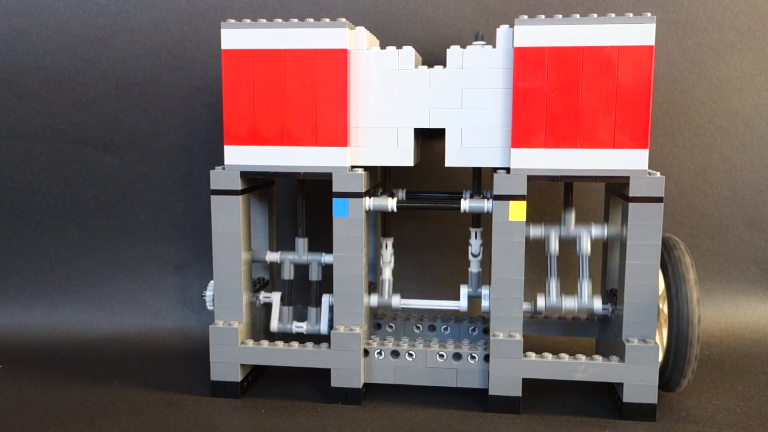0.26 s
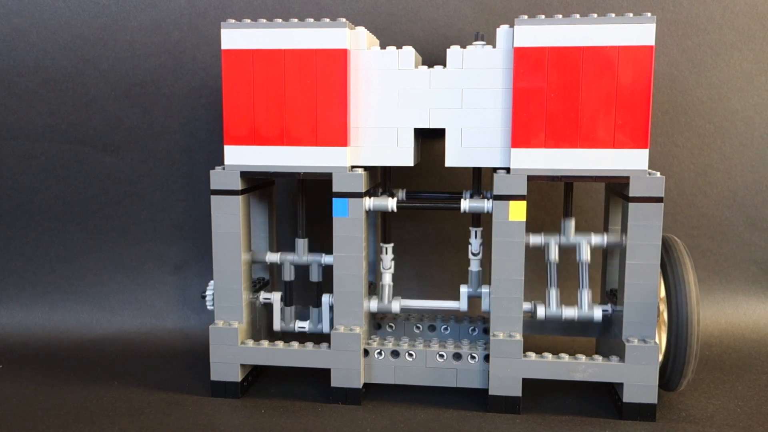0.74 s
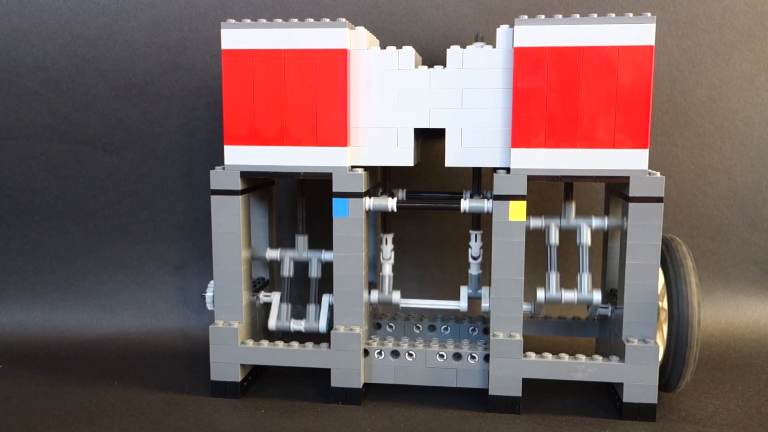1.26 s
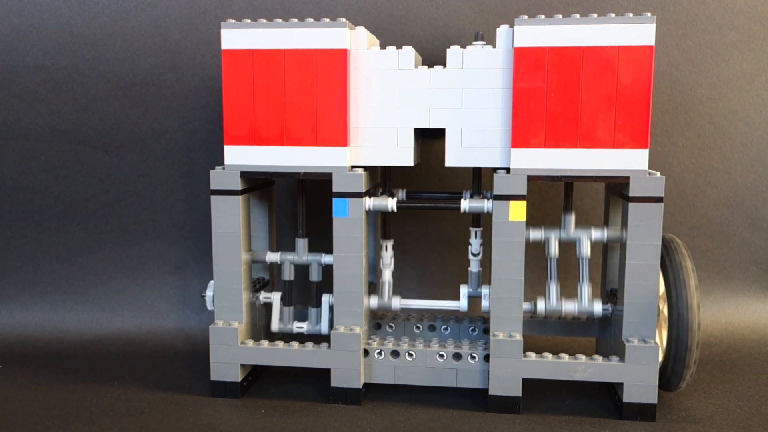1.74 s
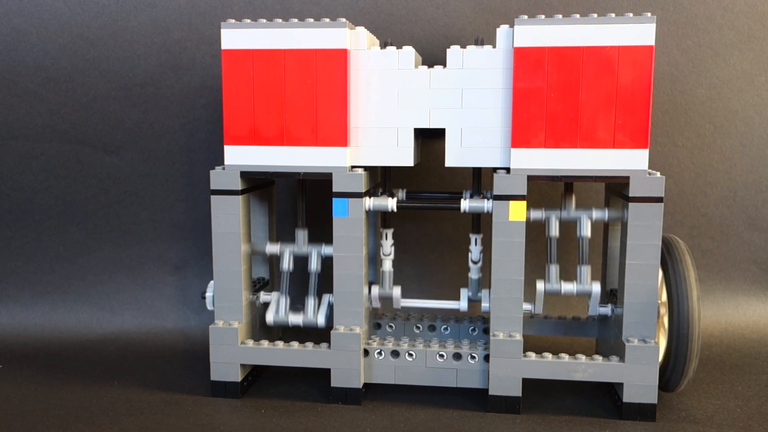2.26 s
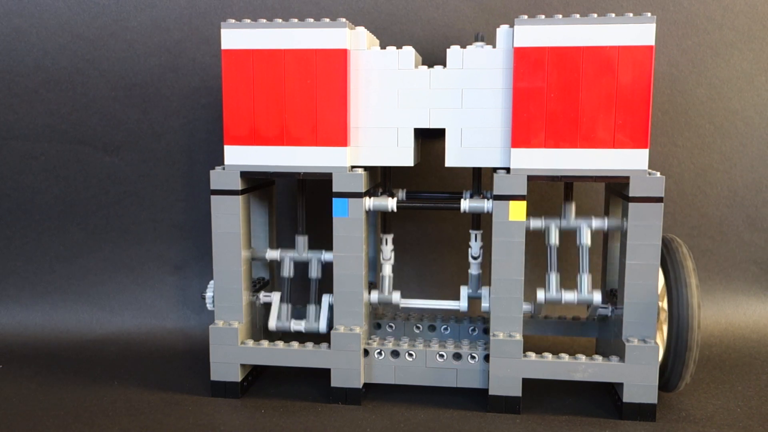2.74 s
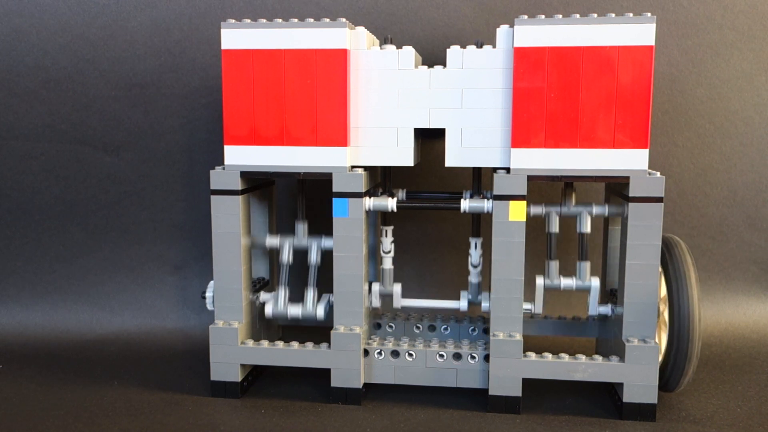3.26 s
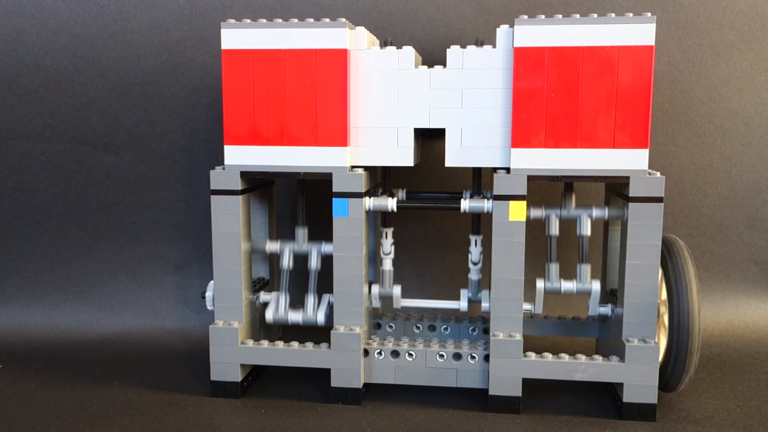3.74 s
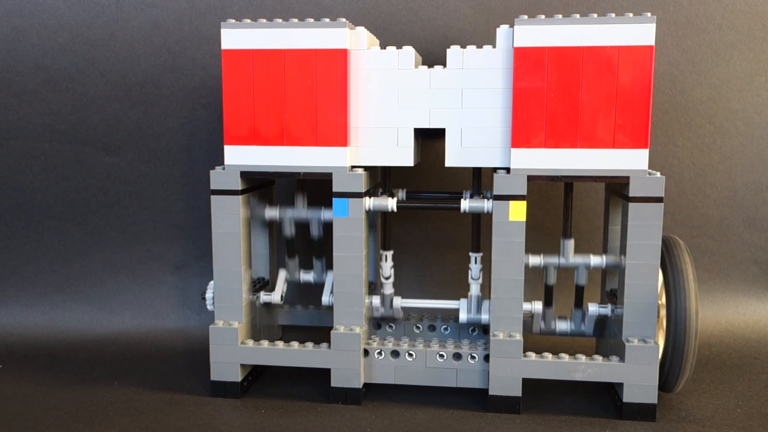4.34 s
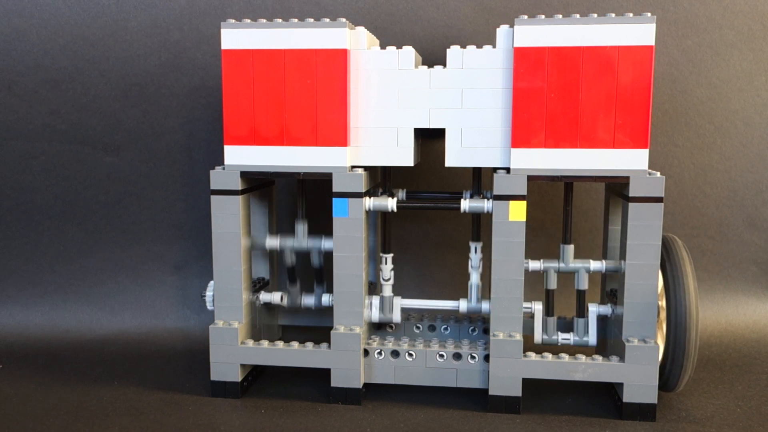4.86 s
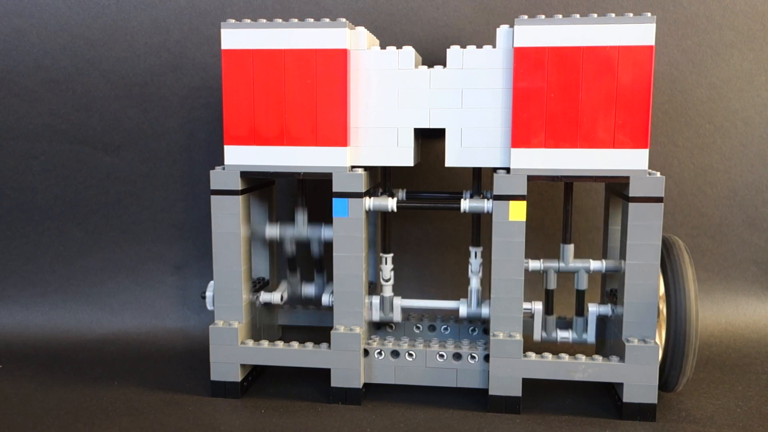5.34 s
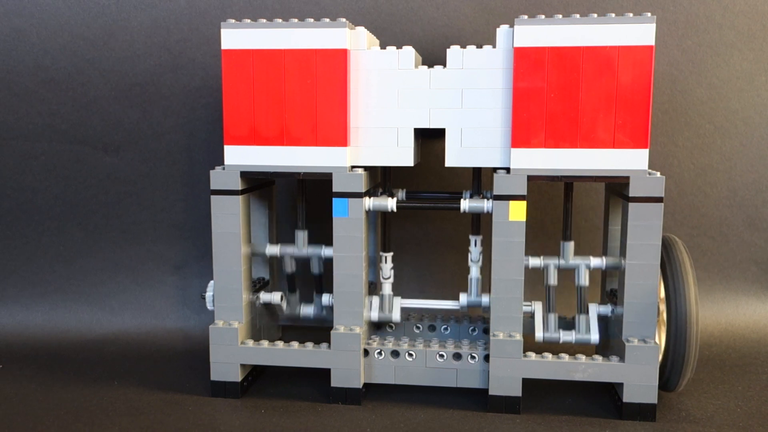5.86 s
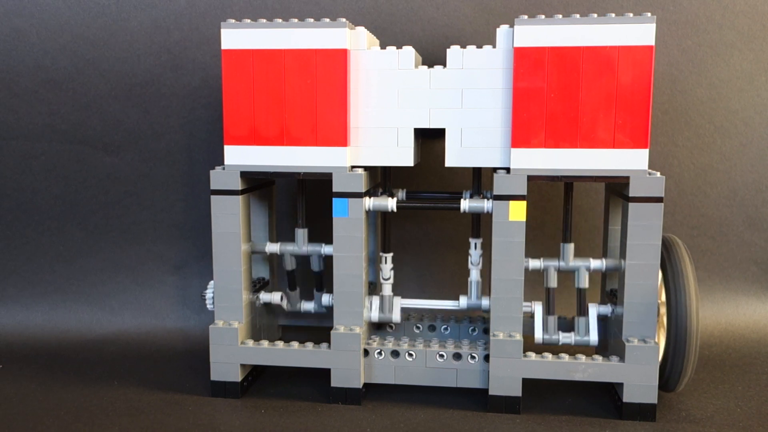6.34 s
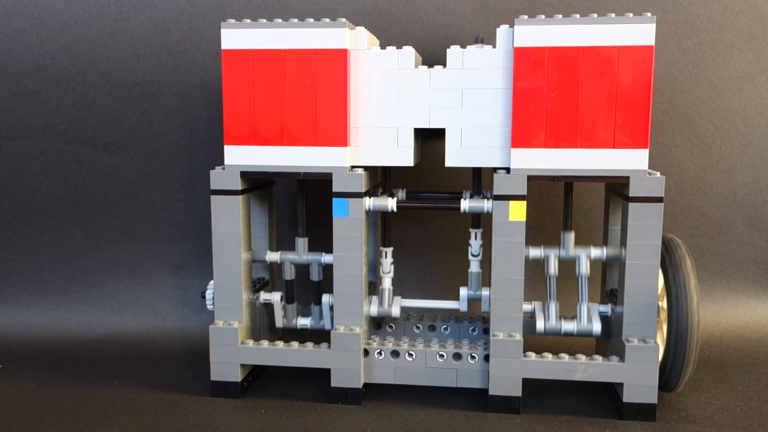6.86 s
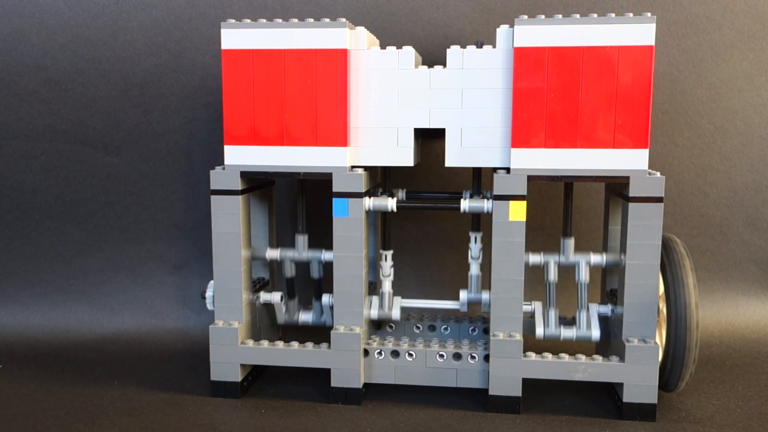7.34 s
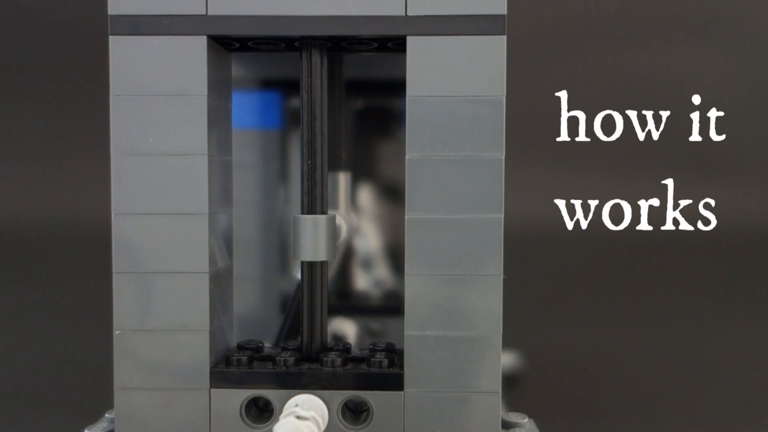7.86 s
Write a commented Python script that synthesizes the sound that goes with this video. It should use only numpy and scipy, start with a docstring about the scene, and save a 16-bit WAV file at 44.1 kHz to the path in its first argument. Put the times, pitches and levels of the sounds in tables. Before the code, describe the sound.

Steady rushing hiss pulses with quick plastic clicks and a tiny squeak each turn, fades to near-silence, then small linkage parts rattle softly.

```python
"""Suction-driven toy engine

A two-cylinder toy engine of plastic bricks turns about four times a second on suction. Turbulent air rushes
steadily into the hose and swells through the ports; small cavities whistle as filtered noise. Valves and rods
knock as decaying sines at set crank angles, and a rod squeaks as a gliding tone. Body and room colour it all.
The engine fades out; after a short near-silence of faint hiss, the linkage rattles as struck modes."""
import sys
import numpy as np
from scipy import signal
from scipy.fft import rfft, irfft, next_fast_len
from scipy.io import wavfile

SR = 44100
rng = np.random.default_rng(int(sys.argv[2]) if len(sys.argv) > 2 else 0)


def inscribe(sig):
    """Save sig as 16-bit PCM at rate SR to the path in sys.argv[1].

    A 1-D sig is mono; a 2-D sig holds one channel per row.
    Samples are clipped to [-1, 1] before scaling.
    """
    pcm = np.round(np.clip(np.atleast_2d(sig).T, -1, 1) * 32767)
    wavfile.write(sys.argv[1], SR, pcm.astype(np.int16))


N = 357077   # length [samples]
PAD = next_fast_len(N)
HZ = np.maximum(np.arange(PAD // 2 + 1) * SR / PAD, 1)   # frequency grid [Hz]


def from_db(db):
    """Level to amplitude: 20 dB is a factor of ten."""
    return 10 ** (np.asarray(db) / 20)


def rms_one(x):
    """Power normalisation: scale to unit rms."""
    return x / np.sqrt(np.mean(x ** 2) + 1e-20)


def over_hz(points):
    """Logarithmic frequency scale: interpolate a table's second column over log frequency."""
    hz, value = np.transpose(points)
    return np.interp(np.log(HZ), np.log(hz), value)


def drift(rate_hz):
    """Random fluctuation: white noise through a two-pole low-pass, scaled to unit rms."""
    step = 40   # samples between computed values
    pole = np.exp(-2 * np.pi * rate_hz * step / SR)
    noise = rng.standard_normal(N // step + 2002)
    slow = signal.lfilter([1], [1, -2 * pole, pole ** 2], noise)[2000:]   # drop the filter's start
    return np.interp(np.arange(N) / step, np.arange(len(slow)), rms_one(slow))


def air(gain, alike):
    """Partial coherence: mid and side noise mixed to a set left-right correlation, shaped by gain; unit rms."""
    mid, side = rfft(rng.standard_normal((2, PAD))) * gain
    alike = np.clip(alike, 0, 1)
    common = np.sqrt(1 + alike) * mid
    opposed = np.sqrt(1 - alike) * side * [[1], [-1]]
    return rms_one(irfft(common + opposed, PAD)[:, :N])


def resonance(hz, width_hz):
    """Simple resonance: gain 1 at the centre, falling by 3 dB at half the width to either side."""
    return 1 / np.sqrt(1 + (2 * (HZ - hz) / width_hz) ** 2)


def ring(clicks, hz, t60_s):
    """Damped oscillation: a unit click excites a sine of height 1 that falls 60 dB in t60."""
    radius, angle = from_db(-60 / (t60_s * SR)), 2 * np.pi * hz / SR
    return signal.lfilter([0, np.sin(angle)], [1, -2 * radius * np.cos(angle), radius ** 2], clicks + 1e-18)


def without_bass(x):
    """Inefficient radiation at long wavelengths: small parts radiate little bass."""
    return signal.sosfilt(signal.butter(2, 500, "high", fs=SR, output="sos"), x)


def from_angle(turns, centre):
    """Cyclic phase: signed distance in turns from the nearest passage of a crank angle."""
    return (turns - centre + .5) % 1 - .5


def bell(turns, centre, length):
    """Periodic modulation: a Gaussian swell once a turn, 1 on top."""
    return np.exp(-.5 * (from_angle(turns, centre) / length) ** 2)


FIRST_TURN_S, TURNS_PER_S, SPEED_UP_PER_S = -.006, 4.047, .0064   # [s], [turns/s], [turns/s per s]


def crank():
    """Uniform angular acceleration: turns made at each sample, gaining speed slowly."""
    s = np.arange(N) / SR - FIRST_TURN_S
    return s * (TURNS_PER_S + SPEED_UP_PER_S * s / 2)


# Spectrum of the steady suction: (frequency [Hz], relative density [dB])
RUSH_SPECTRUM = [(18, -60.5), (30, -36), (60, -37), (129, -26), (306, -12.5), (540, -14.5), (626, -13.5),
                 (1220, -9.5), (1770, -11), (2830, -5), (3280, -7.5), (4630, -4.5), (5110, 1),
                 (6080, -14.5), (9030, -15), (11000, -10), (14300, -48), (22000, -120)]
RUSH_DB = -22


def rush(alike):
    """Turbulent flow noise: broadband noise with a slight wavering of level."""
    level = from_db(RUSH_DB + 0.33 * drift(26))
    return level * air(from_db(over_hz(RUSH_SPECTRUM)), alike)


# Spectrum of air through the ports: (frequency [Hz], relative density [dB])
PORT_SPECTRUM = [(88, -50.5), (150, -23.5), (325, -9.5), (362, -15.5), (1790, -8), (2810, -2), (3240, -5.5),
                 (5080, -6.5), (6080, -12), (9030, -15), (11000, -15.5), (14300, -40), (22000, -120)]
# Three swells of air a turn: (centre [turns], length [turns], opening level [dB])
PORT_SWELLS = [(.3, 0.057, -4.5), (0.719, 0.072, -2.5), (.98, 0.11, 0.5)]
PORT_DB, LEAK_DB = -23.5, -16   # noise level; share that passes when the ports are shut


def ports(turns, alike):
    """Amplitude modulation of flow noise: hiss swells as the ports open, with turbulent flicker."""
    opening = from_db(LEAK_DB)
    for centre, length, db in PORT_SWELLS:
        opening = opening + from_db(db) * bell(turns, centre, length)
    level = from_db(PORT_DB + 1.5 * drift(40))
    return level * opening * air(from_db(over_hz(PORT_SPECTRUM)), alike)


# Cavities blown for part of each turn:
# (centre [turns], length [turns], frequency [Hz], width of one resonance [Hz], mean level at the puff's top [dB])
CAVITIES = [(0.447, .04, 2490, 70, -31), (.74, 0.05, 2860, 240, -29), (.35, .3, 5200, 200, -27),
            (.82, 0.1, 3580, 320, -29.5), (.84, .08, 7800, 600, -33), (.85, 0.091, 9400, 150, -41),
            (.38, 0.06, 5230, 200, -27), (.58, 0.066, 5260, 250, -25), (.88, .09, 5050, 260, -26.5),
            (.05, 0.07, 5200, 280, -28.5), (.8, 0.18, 7400, 2000, -37.5), (.3, 0.048, 560, 150, -39),
            (.8, 0.087, 4320, 390, -31.5), (.78, .12, 2050, 300, -34), (.68, .06, 10000, 300, -40),
            (.52, .1, 5650, 400, -34)]


def whistles(turns, alike):
    """Cavity resonance: noise passes each resonance twice, blown in a puff whose strength wavers."""
    out = 0
    for centre, length, hz, width_hz, db in CAVITIES:
        strength = from_db(db + .8 * drift(7) + .8 * drift(60))
        puff = strength * bell(turns, centre, length)
        out = out + puff * air(resonance(hz, width_hz) ** 2, alike)
    return out


# Contacts of valves and rods: (crank angle [turns], frequency [Hz], t60 [s], mean first-click level [dB])
CONTACTS = [(.285, 2180, 0.031, -20.5), (.32, 6120, .01, -35.5), (.435, 2518, 0.033, -16.5),
            (.435, 3160, 0.022, -25), (.755, 2868, 0.041, -20), (.98, 2326, 0.028, -18.5),
            (.99, 1676, 0.016, -24.5), (.99, 910, 0.022, -39)]
KNOCK_SPREAD_DB, KNOCK_JITTER_S = 2, .002
BOUNCE_S, BOUNCE_DB = 0.0054, -7.5   # median gap; mean level change per bounce


def knocks(turns):
    """Impact excitation: once a turn, early or late, harder or softer, with two bounces in a loose joint."""
    out, whole = np.zeros((2, N)), np.arange(int(turns[-1]))
    for angle, hz, t60_s, db in CONTACTS:
        chance = rng.standard_normal((len(whole), 9))
        at = np.searchsorted(turns, whole + angle) + KNOCK_JITTER_S * SR * chance[:, 0]
        pan_db = chance[:, 1] * [[1], [-1]]
        clicks = np.zeros((2, N))
        for k in range(3):
            level_db = db + k * BOUNCE_DB + KNOCK_SPREAD_DB * chance[:, 2 + k]
            clicks[:, np.clip(at.astype(int), 0, N - 1)] = from_db(level_db + pan_db)
            at = at + BOUNCE_S * SR * np.exp(.4 * chance[:, 5 + k])
        out += ring(clicks, hz, t60_s)
    return without_bass(out)


# Rod squeak, once a turn: (centre [turns], length [turns], frequency [Hz], rise [Hz per turn],
# starting level [dB], octave level [dB])
ROD_SQUEAK = (0.36, 0.042, 1235, 800, -29, -29)
SQUEAK_GROWS_DB_PER_TURN = .1   # fundamental only


def squeak(turns):
    """Frequency modulation: an unsteady rising tone with its octave, harder on some turns than on others."""
    centre, length, hz, rise_hz, db, octave_db = ROD_SQUEAK
    pitch_hz = hz * (1 + .012 * drift(80)) + rise_hz * from_angle(turns, centre)
    phase = 2 * np.pi * np.cumsum(pitch_hz) / SR
    fundamental = from_db(db + SQUEAK_GROWS_DB_PER_TURN * turns + 2 * drift(50)) * np.sin(phase)
    octave = from_db(octave_db + 2.5 * drift(50)) * np.sin(2 * phase)
    return (fundamental + octave) * bell(turns, centre, length) * from_db(1.2 * drift(3))


# Peaks and dips of hose, frame and room: (frequency [Hz], width [Hz], gain [dB])
BODY_RESONANCES = [(101, 13, 5), (118, 8.9, -1.5), (212, 30, 7), (333, 16, 4), (357, 18, -5),
                   (443.5, 27, 6.5), (525, 84, 4.5), (793, 87, 5), (1022, 27, 0.5), (1160, 22, 5),
                   (1478, 27, 5.5), (1640, 21, 0.5), (1942, 25, 2), (2840, 150, 3.5), (3236, 120, -7.5),
                   (4120, 160, -1.5), (4330, 200, 4), (5152, 22, 3.5), (8380, 100, 4.5), (9220, 440, -3),
                   (9730, 220, 1), (10840, 220, 5)]
# Left channel over right: (frequency [Hz], level difference [dB])
LEFT_OVER_RIGHT = [(60, 0.0), (140, -0.5), (350, -0.5), (840, -1.5), (2020, -2.5), (4870, -2.0),
                   (11700, 0.5)]
# Phase of left ahead of right, negative where it lags: (frequency [Hz], phase [rad])
LEFT_PHASE_LEAD = [(0, 0), (5080, -0.0), (5510, 0.23), (6460, -0.16), (8180, -0.2), (8610, -0.73),
                   (10200, 0.17), (10500, -0.088), (11900, -0.1)]
ROOM_T60_S, ROOM_DB = .12, -12   # reflections: decay time; level against the direct sound


def surroundings():
    """Linear transfer function: body peaks and dips, left-right differences, a short dense tail of reflections."""
    body_db = sum(db * resonance(hz, width_hz) ** 2 for hz, width_hz, db in BODY_RESONANCES)
    decay = from_db(-60 * np.arange(SR // 4) / SR / ROOM_T60_S)
    tail = rng.standard_normal(SR // 4) * decay
    room = 1 + from_db(ROOM_DB) * rfft(tail / np.sqrt(np.sum(tail ** 2)), PAD)
    # left leads or lags right in parts of the treble
    lead = np.exp(.5j * over_hz(LEFT_PHASE_LEAD) * [[1], [-1]])
    lean_db = over_hz(LEFT_OVER_RIGHT) / 2 * [[1], [-1]]
    return room * lead * from_db(body_db + lean_db)


# Spectrum of the faint steady hiss: (frequency [Hz], relative density [dB])
QUIET_SPECTRUM = [(35, -52), (60, -14), (182, -18.5), (259, 4), (367, -6), (1110, -12), (11000, -17.5),
                  (14300, -50.5), (22000, -120)]
QUIET_DB = -78.5


def quiet_hiss():
    """Stationary noise: a constant faint hiss, nearly independent on the two sides."""
    return from_db(QUIET_DB) * air(from_db(over_hz(QUIET_SPECTRUM)), .2)


# Louder ticks: (time [s], nominal level [dB], pitch near which the modes ring most [Hz])
LOUD_TICKS = [(7.896, -55, 2260), (7.907, -49, 3300), (7.922, -44, 7300), (7.932, -44, 5520),
              (7.935, -47, 2260), (7.961, -51, 3300), (7.976, -53, 2260), (7.987, -54, 7300),
              (8.008, -45, 2600), (8.025, -59, 2600), (8.039, -49, 1800), (8.047, -54, 1230),
              (8.058, -51, 3300), (8.080, -52, 1230), (8.091, -50, 7300)]
# Modes of the linkage: (frequency [Hz], relative level [dB], t60 [s])
LINKAGE_MODES = [(850, -15, .025), (1230, -7, .05), (1800, -5, .012), (2260, 2, .009), (2900, -4, .008),
                 (3400, -3, .008), (4570, -12, .008), (5520, -9, .02), (6460, -10, .01), (7330, -5, .014),
                 (10200, -12, .008)]
RATTLE_FROM_S, RATTLE_PER_S = 7.893, 1600   # start; mean rate of small ticks
RATTLE_DB, RUB_DB = -66.5, -65.5   # small ticks before the mode levels; rubbing hiss


def rattle():
    """Modal excitation: loud and many small ticks ring the linkage's modes, over a rubbing hiss."""
    s, nominal_db, aim_hz = np.transpose(LOUD_TICKS)
    at, out = np.round(s * SR).astype(int), np.zeros((2, N))
    moving = np.arange(N) > RATTLE_FROM_S * SR
    small = from_db(RATTLE_DB + 3.2 * drift(30)) * (rng.random(N) < RATTLE_PER_S / SR) * moving
    for hz, mode_db, t60_s in LINKAGE_MODES:
        shared = small * rng.standard_normal(N)
        clicks = shared + 0.4 * small * rng.standard_normal((2, N))
        aim_db = -7.0 * np.abs(np.log2(hz / aim_hz))   # modes far from the tick's pitch are struck less
        for late in (0, 40, 95):   # each tick is a short scrape of three contacts [samples]
            level_db = nominal_db + aim_db + rng.normal(-5.5, 1.3, (2, len(at)))
            clicks[:, at + late] += from_db(level_db) * rng.choice([-1, 1], len(at))
        out += from_db(mode_db) * ring(clicks, hz, t60_s)
    rub = from_db(RUB_DB) * moving * air(resonance(4000, 9000), 0.33)
    return without_bass(out) + rub


# Left-right likeness of the engine's air: (frequency [Hz], correlation [1])
AIR_LIKENESS = [(30, .8), (125, 0.97), (250, 0.99), (460, 0.97), (1030, 0.89), (1540, 0.84), (2310, 0.93),
                (3470, 0.83), (5000, 0.87), (5600, 0.49), (6500, 0.69), (7800, .55), (9100, 0.34),
                (10000, .7), (11000, 0.89)]
PUFF_FOCUS = 0.25   # whistles come from small spots: share of the unlikeness that is left
FADE_FROM_S, FADE_TO_S = 6.643, 7.706


def scene():
    """Superposition: the engine fades out, the rattle follows, and a faint hiss lies under both."""
    turns, alike = crank(), over_hz(AIR_LIKENESS)
    engine = rush(alike) + ports(turns, alike)
    engine = engine + whistles(turns, 1 - PUFF_FOCUS * (1 - alike))
    engine = engine + knocks(turns) + squeak(turns)
    engine = irfft(rfft(engine, PAD) * surroundings(), PAD)[:, :N]
    fade_phase = np.interp(np.arange(N) / SR, [FADE_FROM_S, FADE_TO_S], [0, np.pi / 2])
    fade = np.cos(fade_phase) ** 2   # smooth, half a cosine period
    return fade * engine + quiet_hiss() + rattle()


MIC_LOW_HZ, CUTOFF_HZ = 60, 11030


def record(dry):
    """Band limiting: the microphone drops the bass; the top is cut steeply."""
    thin = signal.sosfilt(signal.butter(1, MIC_LOW_HZ, "high", fs=SR, output="sos"), dry)
    return signal.sosfilt(signal.ellip(12, .5, 70, CUTOFF_HZ, fs=SR, output="sos"), thin)


dry = scene()
out = record(dry)
inscribe(out)
```